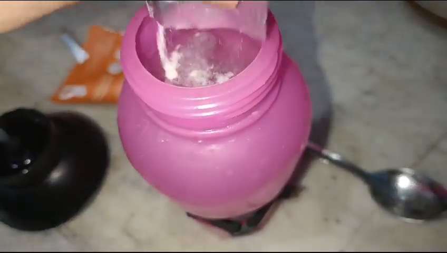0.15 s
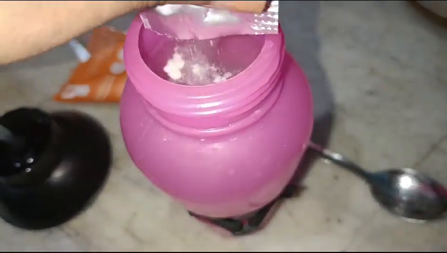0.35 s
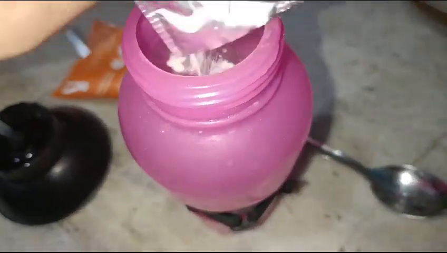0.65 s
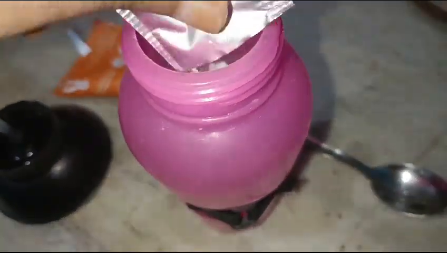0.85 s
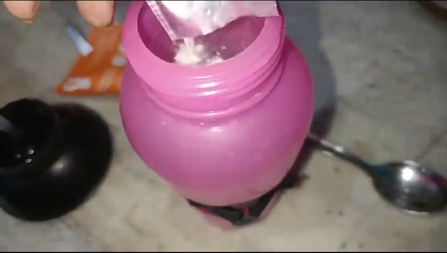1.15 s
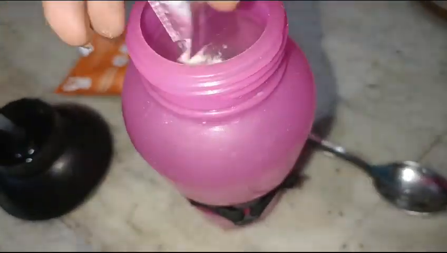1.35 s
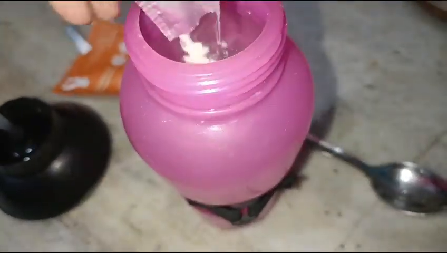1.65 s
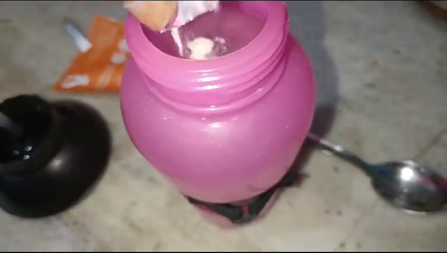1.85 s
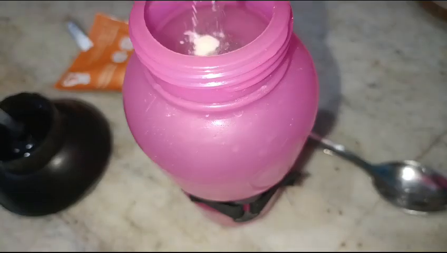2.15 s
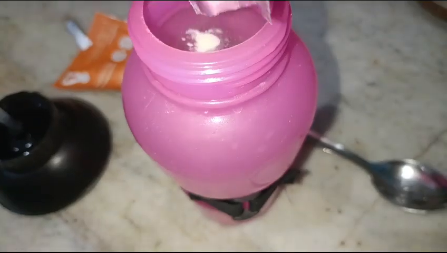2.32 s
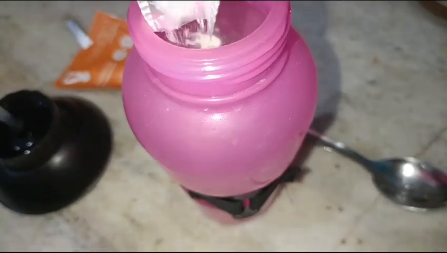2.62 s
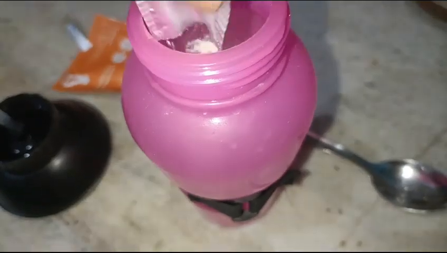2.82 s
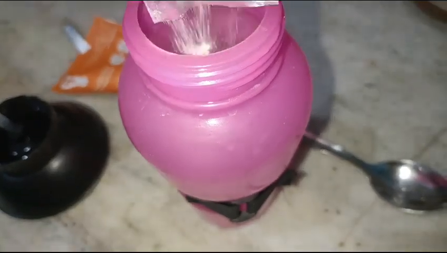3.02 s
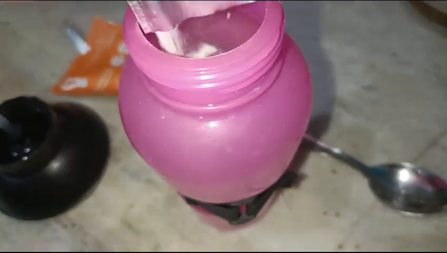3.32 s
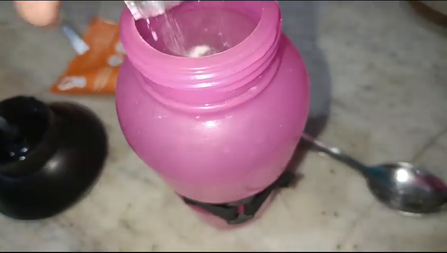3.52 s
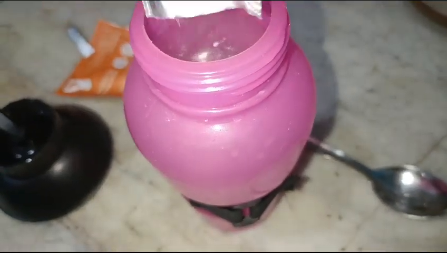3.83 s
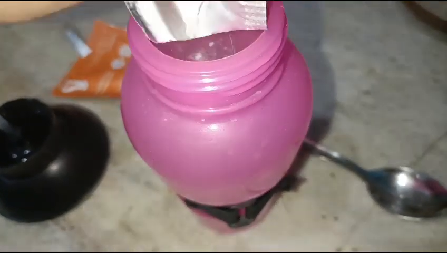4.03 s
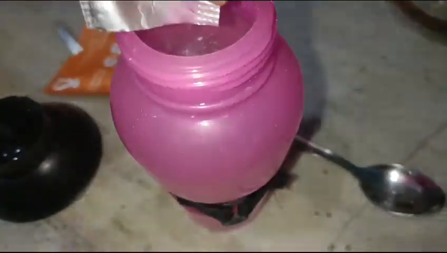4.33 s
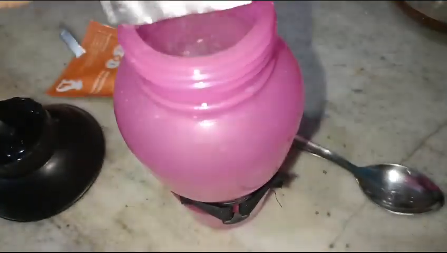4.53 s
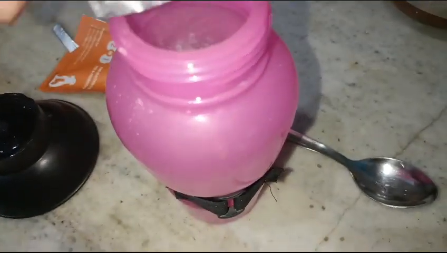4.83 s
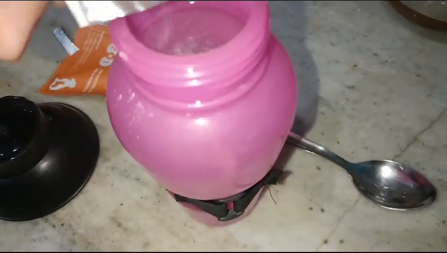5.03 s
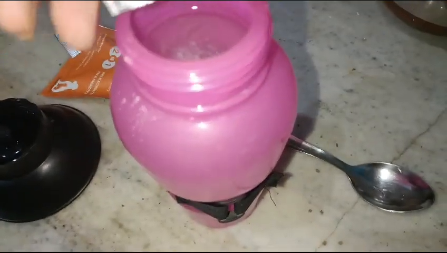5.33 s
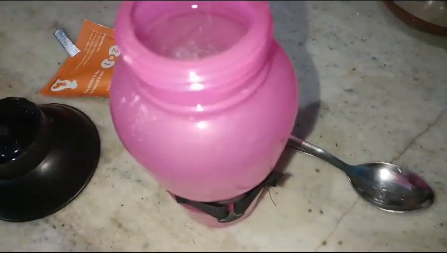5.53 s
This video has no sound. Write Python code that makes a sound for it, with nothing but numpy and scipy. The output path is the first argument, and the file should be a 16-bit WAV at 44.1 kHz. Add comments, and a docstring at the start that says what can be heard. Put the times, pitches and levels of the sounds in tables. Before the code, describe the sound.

Close, crisp foil snaps and fine powdery rustling come in uneven bursts over a plastic bottle in a small hard room with soft fan hum.

```python
"""In a small hard room, close to a phone, a foil sachet is shaken and tapped empty over a plastic bottle.
Its creases buckle in single snaps: each is a pulse with a brief noisy flutter. Random grains make a fine
crackle of foil and powder, and denser runs of grains make the foil rub on itself or on the bottle's rim.
The hand nudges the bottle with dull rumbles of noise. A fan behind hums in wavering tones and air noise.
The phone's right microphone port rings near 2 kHz."""
import sys
import numpy as np
from scipy import signal
from scipy.fft import rfft, irfft, next_fast_len
from scipy.io import wavfile
from scipy.ndimage import uniform_filter1d, minimum_filter1d, map_coordinates

SR = 44100
rng = np.random.default_rng(int(sys.argv[2]) if len(sys.argv) > 2 else 0)


def bounce(signal):
    """Save signal as a 16-bit WAV file at the path given by the first command-line argument."""
    frames = np.transpose(np.atleast_2d(signal))
    limited = np.clip(frames, -1, 1)
    pcm = np.round(limited * 32767).astype(np.int16)
    wavfile.write(sys.argv[1], SR, pcm)


N = 250047

# the larger creases that buckle: t/s, level near 2 kHz before the shared gain/dB, then relative to it
# low pop/dB, treble sparkle/dB, top fizz/dB; last, the resonance of the facet, f/Hz
SNAPS = [(0.0725, -20, -34, -29, -53, 2900), (0.076, -15.5, -31, -31, -53, 2880),
         (0.1324, -23.5, -26, -27, -40, 3190), (0.169, -29.5, -22, -29, -46, 3200),
         (0.382, -27.5, -44, -36, -43, 3230), (0.5275, -28.5, -28, -31, -52, 3200),
         (0.5583, -32.5, -13.5, -17, -47, 5890), (0.6539, -32, -16.5, 0.5, -15, 6140),
         (0.6998, -32, -24, -16, -41, 6500), (1.0435, -12.5, -30.5, -12.5, -30, 6500),
         (1.1016, -20, -22, -9, -28, 9100), (1.2243, -22.5, -28, -15, -35, 7530),
         (1.2595, -32.5, -32, -6.5, -33, 8990), (1.289, -27.5, -39, -12, -33, 2900),
         (1.3028, -19.5, -35, -9, -30, 3410), (1.3063, -23.5, -27, -7, -33, 2850),
         (1.3108, -9.5, -44, -35, -40, 2900), (1.3228, -28.5, -47, 1.5, -19, 8570),
         (1.3327, -16.5, -27, -2.5, -21, 5940), (1.3699, -11.5, -35.5, -23, -37, 6850),
         (1.5558, -9, -33.5, -14, -50, 6600), (2.0378, -27, -15, -7, -28, 6500),
         (2.0872, -34, -21, -10, -28, 6330), (2.2581, -28.5, -30, -11, -25, 2830),
         (2.5066, -18.5, -25, -12, -19.5, 7200), (2.8861, -15.5, -47, -23, -70, 5320),
         (2.9191, -30, -14, -27, -49, 2960), (2.9292, -33, -12, -6, -51, 4640),
         (3.028, -16, -27.5, -6.5, -17.5, 3340), (3.0799, -21.5, -24, -13.5, -35, 7050),
         (3.2308, -24.5, -23, -14.5, -60, 3380), (3.2575, -23, -19, -7, -34, 3380),
         (3.3414, -25, -28, -25, -40, 2920), (3.3944, -17, -32, -17.5, -42, 6470),
         (3.4038, -14, -26.5, -12, -29, 7550), (3.4484, -17.5, -32, -27, -41, 7180),
         (3.472, -27.5, -35, -2.5, -38, 7150), (3.5219, -24.5, -34, -8, -29, 5940),
         (3.6292, -35, -18, -13, -37, 6290), (3.8727, -31.5, -22, -17, -40, 2900),
         (3.9025, -22.5, -37, -11.5, -47, 3210), (3.9201, -18, -40, -7.5, -29, 8570),
         (3.9349, -23.5, -14.5, -8.5, -40, 6270), (3.949, -30, -30, -2.5, -28, 6150),
         (4.0212, -26, -34, -27, -37, 2870), (4.0381, -20.5, -38, -5.5, -50, 5800),
         (4.1173, -12, -20.5, -10.5, -22.5, 9050), (4.5735, -26, -17, -13, -46, 3270),
         (4.6888, -28, -11.5, -0.5, -26, 6930), (4.8197, -37.5, -13, 3, -41, 3400),
         (4.8467, -23.5, -29, -20, -72, 3210), (4.9291, -34, -23, -4.5, -48, 3390),
         (5.001, -13.5, -23, -14, -32.5, 7560), (5.3295, -34.5, -18, -0.5, -43, 3270),
         (5.438, -53, -13, 12, 6, 6860), (5.4943, -22.5, -18.5, -2.5, -15, 6100),
         (5.5348, -28.5, -24, -6, -31, 4510), (5.5802, -20.5, -18.5, -7, -11, 6940),
         (5.6004, -30, -30, -3.5, -23, 6040)]


def amp(db):
    """Turn decibels into a gain."""
    return 10 ** (np.asarray(db) / 20)


def unit(x):
    """Scale x to an rms (average strength) of 1."""
    return x / np.sqrt(np.mean(x ** 2) + 1e-20)


def along(points, hz):
    """Read a curve of (f/Hz, value) points at any frequency, on a log axis as pitch is heard."""
    f, value = np.transpose(points)
    return np.interp(np.log(hz + 1), np.log(f + 1), value)


def wobble(rate):
    """Draw a smooth random curve through this many random points a second."""
    knots = rng.standard_normal(int(N * rate / SR) + 4)
    return map_coordinates(knots, [np.arange(N) * rate / SR])


def filtered(x, response):
    """Multiply the spectrum of x by a response that depends on frequency."""
    size = next_fast_len(N + SR // 4)  # spare room keeps the end from wrapping onto the start
    hz = np.fft.rfftfreq(size, 1 / SR)
    return irfft(rfft(x, size) * response(hz), size)[..., :N]


def coloured(x, points):
    """Shape the tone of x by (f/Hz, level/dB) points, then scale it to rms 1."""
    return unit(filtered(x, lambda hz: amp(along(points, hz))))


def causal(gain_db):
    """Turn gains on an FFT grid into the impulse response that sounds as early as it can (minimum phase)."""
    cepstrum = irfft(np.log(amp(gain_db)))
    half = len(cepstrum) // 2
    # folding the second half onto the first leaves nothing before time zero
    cepstrum[1:half] *= 2
    cepstrum[half + 1:] = 0
    return irfft(np.exp(rfft(cepstrum)))


def add(track, s, sound):
    """Mix a sound into the track at s seconds."""
    start = max(round(s * SR), 0)
    track[start:start + len(sound)] += sound[:max(N - start, 0)]


def grains(rate, spread_db):
    """Scatter random tiny impulses, on average rate a second, a few larger than the rest; rms 1."""
    sizes = amp(spread_db * np.minimum(rng.exponential(size=N), 3))
    present = rng.random(N) < rate / SR
    return unit(present * rng.choice([-1, 1], N) * sizes)


def swell(s, half_s):
    """A bell-shaped stroke centred on s seconds; half_s away from there it is down to 37 percent."""
    distance = (np.arange(N) / SR - s) / half_s
    return np.exp(-np.minimum(distance ** 2, 50))


def fan(air_db, hum_db, apart_db):
    """Unsteady hum lines in a rush of air; the air's bass reaches both ports almost alike."""
    # the hum lines: f/Hz, level before hum_db and the wavering/dB
    hum_lines = [(96.9, -55.5), (145.3, -58), (199.2, -55.5), (247.6, -59), (328.4, -63)]
    # steady air noise of the room: f/Hz, level/dB
    air_colour = [(25, -23), (45, -13.5), (75, 0), (110, 4), (250, -1), (380, 4), (460, -6), (540, -3),
                  (620, -9.5), (780, -5), (1300, -20.5), (2200, -29.5), (4500, -38), (15000, -42)]
    t = np.arange(N) / SR
    hum = np.zeros(N)
    for hz, db in hum_lines:
        level = amp(db + 3 * wobble(11)) * np.sqrt(2)  # a sine of peak sqrt(2) has rms 1
        hum += level * np.sin(2 * np.pi * hz * t + 1.4 * wobble(hz / 8))
    mid, side = coloured(rng.standard_normal((2, N)), air_colour) * amp(0.09 * wobble(13.0))
    # how much the ports differ: f/Hz, level/dB
    difference = [(30, -28), (80, -6.5), (250, -10.5), (600, -7), (1500, 0)]
    side = filtered(side, lambda hz: amp(along(difference, hz)))
    air = np.array([mid + side, mid - side])
    balance = amp([[-apart_db], [apart_db]])  # the hum is softer on the left, louder on the right
    return amp(air_db) * air + amp(hum_db) * hum * balance


def bumps():
    """The hand nudges the bottle: soft contact gives only a dull rumble, made of swelling noise."""
    # the nudges: centre t/s, half length/s, level/dB
    nudges = [(.195, .025, -45), (2.935, .035, -42), (3.04, .08, -45), (3.99, .06, -45)]
    # their dull tone: f/Hz, level/dB
    nudge_colour = [(50, -28), (130, -38), (200, 19), (330, 6), (700, -66), (2000, -55), (8000, -88)]
    strength = sum(amp(db) * swell(s, half_s) for s, half_s, db in nudges)
    return strength * coloured(rng.standard_normal(N), nudge_colour)


def rubs():
    """The foil catches and slips in a dense run of grains; on the rim it also drives the bottle."""
    # rubs on the foil itself or on the rim: centre t/s, half length/s, level/dB,
    # the bottle's hollow body relative to that level/dB
    rub_strokes = [(0.128, 0.011, -57.5, 16.5), (0.413, 0.012, -68.5, 19.5), (0.758, 0.011, -46, -6),
                   (0.904, 0.013, -48.5, -5.5), (1.903, 0.038, -50.5, -34), (2.212, 0.053, -51, -13),
                   (2.362, 0.019, -52.5, -38), (2.935, 0.0062, -39, 9), (2.953, 0.005, -44, 8),
                   (5.541, 0.015, -33.5, -19.5), (5.582, 0.012, -32, -10)]
    # tone of the rubbed foil: f/Hz, level/dB
    rub_colour = [(200, -32), (1000, -18), (2200, -15), (3300, -7.5), (4500, -1), (9000, -3.5), (16000, -1)]
    # tone of the bottle's hollow body: f/Hz, level/dB
    bottle_colour = [(100, -7), (250, -15), (800, 3.5), (1500, -4), (2300, -5.5), (5000, -9.5),
                     (16000, -67)]
    slips = grains(rate=5000, spread_db=3)
    sheet, body = np.zeros(N), np.zeros(N)
    for s, half_s, db, body_db in rub_strokes:
        stroke = amp(db) * swell(s, half_s)
        sheet += stroke
        body += stroke * amp(body_db)
    return sheet * coloured(slips, rub_colour) + body * coloured(slips, bottle_colour)


def rustle(crackle_db, powder_db):
    """Small wrinkles tick in clumps while the powder slides with a soft hiss of many grains."""
    # how busily the fingers work the packet: t/s, level before the crackle and powder gains/dB
    finger_work = [(0, -63), (.15, -39.5), (.47, -70), (.7, -38), (.98, -59), (1.68, -47), (1.81, -86),
                   (1.9, -42.5), (2.43, -65), (2.95, -48.5), (3.5, -41), (3.72, -67), (3.95, -37),
                   (4.5, -53.5), (5.15, -46), (5.38, -48.5), (5.67, -60)]
    # tone of crackle and powder: f/Hz, level/dB
    rustle_colour = [(200, -42), (900, -2), (2200, -1.5), (3400, -9), (5000, -1.5), (9000, -18),
                     (16000, 0.5)]
    motion = amp(np.interp(np.arange(N) / SR, *np.transpose(finger_work)))
    ticks = grains(rate=170, spread_db=4) * amp(2.5 * wobble(25))
    decay_s = .0006  # each wrinkle's flutter falls to 37 percent in this time
    flutter = signal.lfilter([1], [1, -np.exp(-1 / (decay_s * SR))], np.abs(ticks))
    crackle = coloured(flutter * rng.standard_normal(N), rustle_colour)
    sliding = grains(rate=6000, spread_db=3) * amp(1.5 * wobble(18))
    powder = coloured(sliding, rustle_colour)
    return motion * (amp(crackle_db) * crackle + amp(powder_db) * powder)


def small_creases(count=2):
    """Each large snap loosens count small creases, which give way soon after it; rows like those of SNAPS."""
    # range of the random facet resonances: lowest f/Hz, highest f/Hz
    low, high = (2430, 7000)
    mean_delay_s = .07
    level_db, level_scatter_db = -43, 4.5
    pop_db, sparkle_db, fizz_db, sparkle_scatter_db = -20.5, -14.5, -30.5, 5
    rows = []
    for s, *_ in SNAPS * count:
        size, stiffness = rng.standard_normal(2)
        bright_db = sparkle_scatter_db * stiffness
        start_s = s + mean_delay_s * rng.exponential()
        facet_hz = low * (high / low) ** rng.random()
        rows.append((start_s, level_db + level_scatter_db * size, pop_db,
                     sparkle_db + bright_db, fizz_db + bright_db, facet_hz))
    return rows


def buckle(flutter_s, flutter_db, apart_db, size=1024):
    """One crease flips: a pulse and a brief flutter of the sheet, a little different at each port."""
    t = np.arange(size) / SR
    shared = amp(flutter_db) * rng.standard_normal(size)
    shake = shared + amp(apart_db) * rng.standard_normal((2, size))
    life = t / (flutter_s * np.exp(.35 * rng.standard_normal()))  # every flutter lasts a bit differently
    bursts = shake * (1 + life) * np.exp(-life)
    bursts[:, 0] += rng.choice([-1, 1])  # the pulse, inward or outward
    # narrow peaks and gaps stay, broad bands carry equal energy
    power = np.abs(rfft(bursts)) ** 2
    broad_db = 10 * np.log10(np.abs(uniform_filter1d(power, size=56)) + 1e-12)
    return np.array([signal.fftconvolve(burst, causal(-db))[:size] for burst, db in zip(bursts, broad_db)])


def snaps(gain_db, facet_octaves):
    """Large facets pop low, small stiff ones sparkle; each has one damped resonance of its own."""
    # the colour that all snaps share: f/Hz, level/dB
    snap_colour = [(40, -25), (150, 15), (1000, 24), (1600, 5), (2100, -3), (2450, 3), (3000, -1.5),
                   (4300, 5.5), (7500, 3.5), (14500, 22.5)]
    edge_share = 0.88  # how far the upper mids follow the sparkle
    facet_db = 5  # boost at the facet's resonance
    # louder snaps flutter longer, as larger facets do: the time at one level, and the rise that doubles it
    flutter_s, flutter_at_db, doubles_db = .0005, -22, 26
    ports = np.zeros((2, N))
    hz = np.fft.rfftfreq(512, 1 / SR)
    for s, db, pop_db, sparkle_db, fizz_db, facet_hz in [*SNAPS, *small_creases()]:
        # pop, body, edge, sparkle and fizz: f/Hz, level/dB
        own = [(1000, pop_db), (2200, 0), (4300, edge_share * sparkle_db),
               (7500, sparkle_db), (14500, fizz_db)]
        colour = along(snap_colour, hz) + along(own, hz)
        octaves_off = np.log2((hz + 1) / facet_hz)
        facet = facet_db / (1 + (octaves_off / facet_octaves) ** 2)
        life_s = flutter_s * 2 ** ((db - flutter_at_db) / doubles_db)
        flip = buckle(life_s, flutter_db=-6, apart_db=-9)
        sounds = signal.fftconvolve(flip, causal(colour + facet)[None], axes=1)
        for port, sound in zip(ports, sounds):
            add(port, s, amp(db + gain_db) * sound)
    return ports


def room(x, tail_db, early_db, early_s, count=40):
    """Worktop and near walls answer first, the room rings on; echoes are random, new for each short stretch."""
    # the room's answer: f/Hz, time for the tail to fall by 60 dB/s, level/dB
    ringing = np.array([(200, .45, -1), (1000, .42, 0), (2200, .47, -1), (4500, .38, -1), (6500, .47, 1),
                        (10000, .4, 0), (12500, .2, -9), (15000, .2, -9)])
    wet, length = np.zeros((2, N)), SR // 2
    t = np.arange(length) / SR
    arrival = np.clip((t - .004) / .002, 0, 1)  # silent for 4 ms, full after 6 ms
    # count equal stretches, each with its own random echoes
    for part in np.array_split(np.arange(N), count):
        hz, at, noise = signal.stft(rng.standard_normal((2, length)), SR, nperseg=256)
        late = unit(amp(-60 * at / along(ringing[:, :2], hz)[:, None]))
        early = unit(np.exp(-at / early_s))
        tone = amp(along(ringing[:, [0, 2]], hz))[:, None]
        fade = tone * np.hypot(amp(tail_db) * late, amp(early_db) * early)
        answer = signal.istft(noise * fade, SR, nperseg=256)[1][:, :length]
        answer = answer * arrival / np.sqrt(length)
        for port, echo in zip(wet, signal.fftconvolve(x[None, part], answer, axes=1)):
            add(port, part[0] / SR, echo)
    return wet


def scene():
    """Mix all layers; the foil's sound comes through the right port a fraction of a millisecond later."""
    foil = snaps(gain_db=22, facet_octaves=0.14) + rubs() + rustle(crackle_db=-6.5, powder_db=-16.5)
    left, right = foil
    lag_s = .00032
    late_right = filtered(right, lambda hz: np.exp(-2j * np.pi * hz * lag_s))
    direct = np.array([left, late_right])
    echoes = room((left + right) / 2, tail_db=-11.0, early_db=1.5, early_s=0.0048)
    return direct + echoes + bumps() + fan(air_db=-44, hum_db=5.5, apart_db=2.0)


def record(dry):
    """Each port adds its own resonances, a fast limiter holds the biggest peaks, and the band ends steeply."""
    # response of the left microphone port: f/Hz, level/dB
    left_port = [(300, -9), (1100, -7.5), (1650, 3), (2400, 1.5), (3300, 1.5), (5000, 3.5), (6200, 3.5),
                 (7000, 2.5), (8000, -1), (9200, -0.5), (11500, -14.5), (13800, -34), (15200, -10.5),
                 (17000, -49.5)]
    # response of the right microphone port: f/Hz, level/dB
    right_port = [(300, -9.5), (900, -10.5), (1400, 1.5), (1720, 4.5), (2030, 15.5), (2130, 18), (2270, 15),
                  (2520, 7.5), (2950, 5), (5000, -3.5), (6600, 4.5), (8000, 4), (9100, 1), (12000, -19),
                  (13800, -25), (15200, -10), (17000, -35)]
    top_hz = 17200
    grid = np.fft.rfftfreq(2048, 1 / SR)
    ports = np.array([signal.fftconvolve(x, causal(along(port, grid)))[:N]
                      for x, port in zip(dry, (left_port, right_port))])
    # one gain for both ports turns down peaks above 0.9, eased in and out over about 3 ms
    needed = 1 / np.maximum(np.abs(ports).max(axis=0) / .9, 1)
    gain = uniform_filter1d(minimum_filter1d(needed, size=129), size=129)
    return filtered(gain * ports, lambda hz: hz < top_hz)


dry = scene()
out = record(dry)
bounce(out)
```